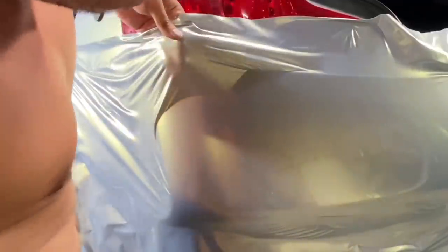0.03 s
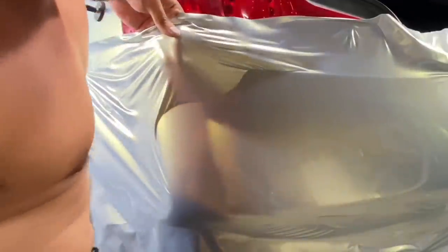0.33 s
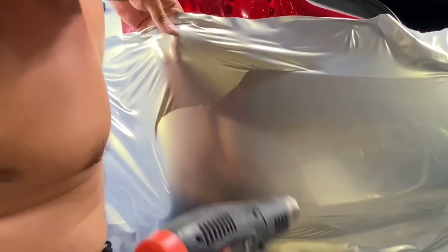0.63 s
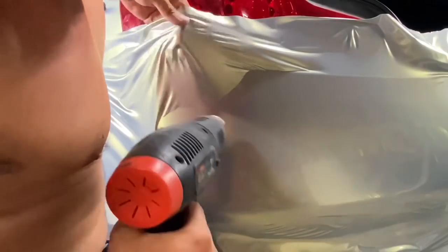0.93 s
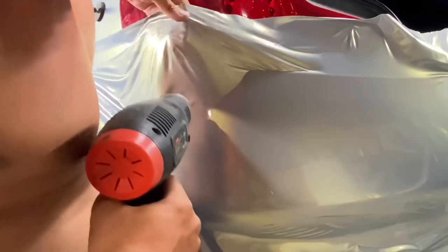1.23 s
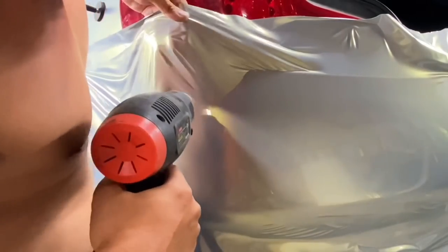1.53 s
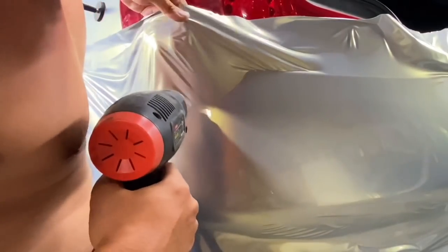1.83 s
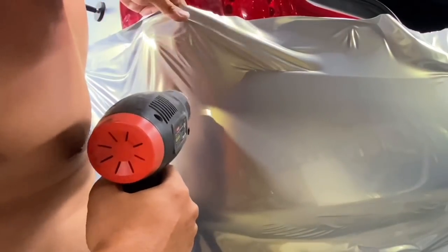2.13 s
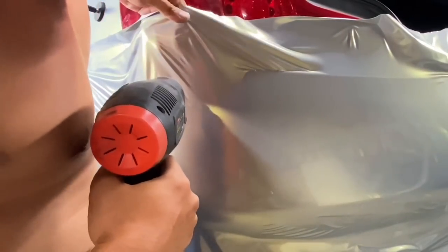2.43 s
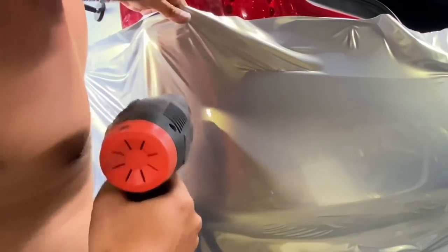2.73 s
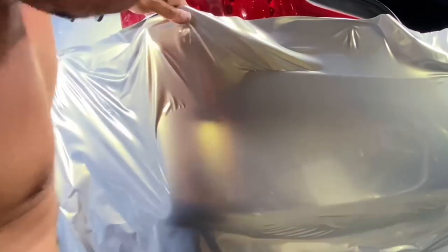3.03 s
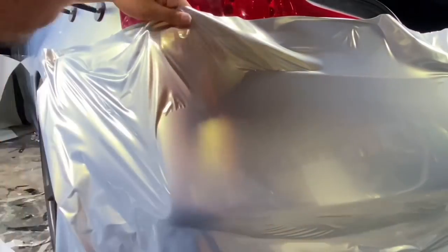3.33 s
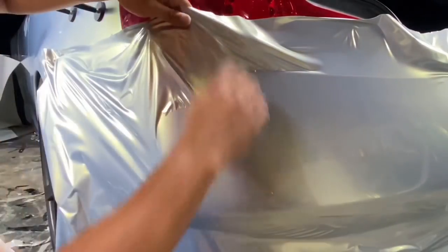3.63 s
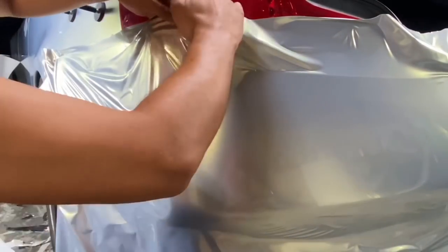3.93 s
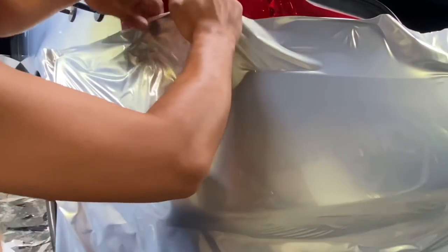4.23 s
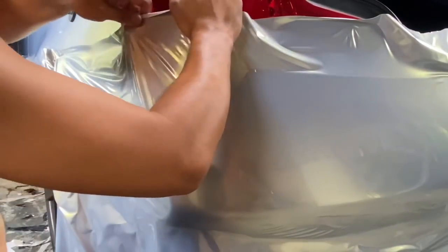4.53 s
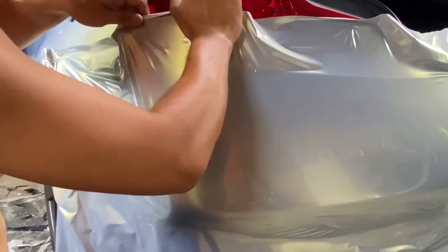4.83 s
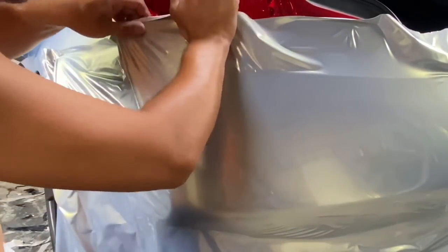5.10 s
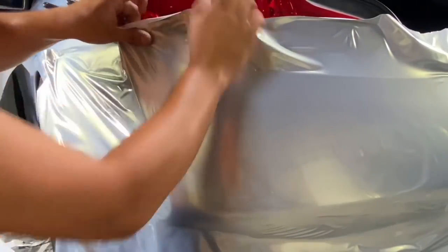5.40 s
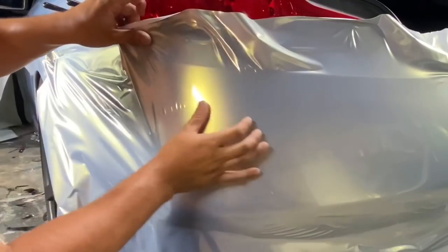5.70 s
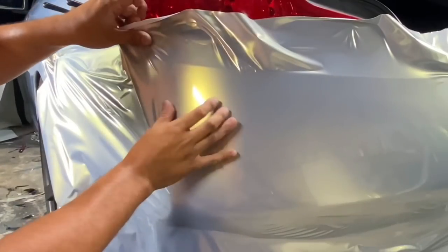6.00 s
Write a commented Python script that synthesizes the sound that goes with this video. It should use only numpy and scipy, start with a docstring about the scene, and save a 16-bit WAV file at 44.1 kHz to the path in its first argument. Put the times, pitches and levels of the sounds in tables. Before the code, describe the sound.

Stiff vinyl film snaps and crinkles close by in a small workshop. A heat gun spins up with a rising whine and blows steadily for about two seconds, then clicks off and coasts down. As it fades, the film cracks loudly several times with dull thumps on a car panel. Lighter crackles and low flaps follow as hands stretch the sheet, ending with faint palm rubs.

```python
"""Heat gun and vinyl wrap

Close by in a small workshop, a heat gun spins up, blows for two seconds and coasts down: harmonics of
its shaft sound over the turbulent rush of air. Hands pull stiff film over a car panel: creases buckle,
wrinkles crackle, the sheet flaps in its low modes, knocks send bending waves through the panel and a
palm rubs the film. The walls add a short reverberation over a low room rumble."""
import sys
import numpy as np
from scipy import signal
from scipy.fft import rfft, irfft, next_fast_len
from scipy.io import wavfile
from scipy.ndimage import uniform_filter1d, minimum_filter1d, map_coordinates

SR = 44100
rng = np.random.default_rng(int(sys.argv[2]) if len(sys.argv) > 2 else 0)


def unload_wav(signal):
    """Save mono or channel-first audio to the path in sys.argv[1] as 16-bit WAV at rate SR, clipped to [-1, 1]."""
    wavfile.write(
        sys.argv[1],
        SR,
        np.round(np.clip(np.atleast_2d(signal).T, -1, 1) * 32767).astype(np.int16),
    )


N = 276021
T = np.arange(N) / SR
ON_S, OFF_S, FULL_HZ = 0.69, 2.89, 239.1  # the gun's switching times and full shaft rate

# low modes of the stretched sheet and the panel under it: pitch_hz, level_db, t60_s
SHEET_MODES = [(110, 1.5, 0.17), (138.3, -4, 0.13), (182.1, -2.5, 0.18), (219.8, 3, 0.18), (306.3, 2, 0.1),
               (338, -7.5, 0.18), (401, -7.5, 0.15)]


def undb(db):
    """Amplitude ratio: tenfold for every 20 dB."""
    return 10 ** (np.asarray(db) / 20)


def unit(x):
    """Normalisation to an rms of 1."""
    return x / np.sqrt(np.mean(x ** 2) + 1e-20)


def curves(table):
    """Linear interpolation of each column over the times in the first."""
    times, *columns = np.transpose(table)
    return [np.interp(T, times, column) for column in columns]


def shape(points, hz):
    """Spectral envelope: (frequency_hz, level_db) points interpolated in log frequency."""
    point_hz, db = np.transpose(points)
    return np.interp(np.log(hz + 1), np.log(point_hz), db)


def colour(x, points, db_scale=1):
    """Minimum-phase filter: folding the cepstrum makes the given spectrum causal."""
    size = 2 * next_fast_len(x.shape[-1])
    cepstrum = irfft(np.log(undb(db_scale * shape(points, np.fft.rfftfreq(size, 1 / SR)))))
    cepstrum[1:size // 2] *= 2
    cepstrum[size // 2 + 1:] = 0
    return irfft(rfft(x, size) * np.exp(rfft(cepstrum)))[..., :x.shape[-1]]


def band(x, low_hz, high_hz, order=2):
    """Butterworth band-pass filter."""
    sos = signal.butter(order, [low_hz, min(high_hz, .45 * SR)], "band", fs=SR, output="sos")
    return signal.sosfilt(sos, x)


def highpass(x, corner_hz):
    """First-order high-pass filter."""
    return signal.sosfilt(signal.butter(1, corner_hz, "high", fs=SR, output="sos"), x)


def wander(rate_hz):
    """Random modulation: smoothed Gaussian steps with a spread near 1."""
    hold = int(SR / rate_hz)
    steps = np.repeat(rng.standard_normal(N // hold + 1), hold)
    return 1.3 * uniform_filter1d(uniform_filter1d(steps, hold), hold)[:N]


def diffuse(size, coherent_hz):
    """Diffuse field at two close microphones: coherent in the bass, unrelated above."""
    mid, side = rng.standard_normal((2, size))
    side = highpass(side, coherent_hz)
    return unit(np.array([mid + side, mid - side]))


def pan(db):
    """Level difference, left minus right, as a pair of gains."""
    return undb(np.array([[db], [-db]]) / 2)


def from_left(x, lag=6):
    """Arrival-time difference: the right channel lags by a few samples."""
    return np.array([x, np.pad(x, (lag, 0))[:len(x)]])


def workshop(x, wet_db, t60_s, lag=6):
    """Reverberation: near walls follow the direct sound with a dense exponential tail."""
    t = T[:SR // 2]
    tail = diffuse(len(t), 400) * undb(-60 * t / t60_s) * (1 - np.exp(-t / 0.0064))
    reflected = signal.fftconvolve(x[None], unit(tail) / np.sqrt(len(t)), axes=1)[:, :N]
    return from_left(x, lag) + undb(wet_db) * reflected


def room_rumble():
    """Ambient noise: a diffuse field of low rumble and faint hiss."""
    # background spectrum: frequency_hz, level_db
    spectrum = [(20, -25), (36, -7.5), (85, -5.5), (125, -6.5), (160, -18.5), (230, -15.5), (340, -30),
                (520, -25.5), (1200, -32), (5000, -53), (10000, -46.5), (12500, -67)]
    return unit(colour(diffuse(N, 450), spectrum)) * undb(-59.5 + 0.71 * wander(11))


def strain(swell_db=20.5, release_db_per_s=185.5):
    """Loading and release: each pull raises the crackle and wobble levels, then lets them fall."""
    # pulls of the hands: peak_s, build_s, crackle_db, wobble_db
    pulls = [(0.021, 0.1, -45.5, -72.5), (0.25, 0.91, -50.5, -68), (0.781, 0.098, -32, -44.5),
             (0.95, 0.052, -41, -42.5), (2.91, 0.55, -36.5, -51), (3.27, 0.29, -31, -40),
             (3.831, 1, -53, -55), (4.12, 0.78, -47.5, -55), (4.268, 0.2, -38.5, -41.5),
             (4.49, 0.055, -46, -52), (4.73, 0.13, -52, -42), (4.94, 0.088, -46, -44),
             (5.11, 0.061, -59, -48), (5.27, 0.27, -52.5, -45.5), (5.51, 0.064, -59.5, -56),
             (6.1, 0.09, -74, -48), (6.25, 0.098, -61, -54.5)]
    crackle_db, wobble_db = -90, -70.5  # film that is only held taut
    for peak_s, build_s, fine_db, low_db in pulls:
        slack_db = np.minimum(swell_db * (T - peak_s) / build_s, release_db_per_s * (peak_s - T))
        crackle_db = np.maximum(crackle_db, fine_db + slack_db)
        wobble_db = np.maximum(wobble_db, low_db + slack_db)
    return crackle_db, wobble_db


def wrinkles(size, rate_hz, range_db):
    """Poisson process: small folds flip independently, each a click of uneven strength."""
    strength = undb(np.minimum(4 * rng.exponential(size=size), range_db))
    polarity = rng.choice([-1, 1], size)
    return strength * polarity * (rng.random(size) < rate_hz / SR)


def pulled_film(gain_db=-6):
    """Random excitation: under strain, wrinkles give way and the sheet wobbles in its low modes."""
    crackle_db, wobble_db = strain()
    tick_spectrum = [(200, -25.5), (600, -15), (1400, 1.5), (3000, -5.5), (5000, -10), (9000, -15.5),
                     (12000, -28.5)]  # frequency_hz, level_db
    ticks = unit(colour(wrinkles(N, rate_hz=260, range_db=16), tick_spectrum))
    crackle = workshop(ticks * undb(crackle_db + gain_db), wet_db=2.5, t60_s=0.093)
    push = diffuse(N, 370)
    modes = sum(undb(db) * band(push, hz - 10, hz + 10, order=1) for hz, db, _ in SHEET_MODES)
    wobble = unit(modes) + undb(-2) * unit(band(push, 70, 510))
    return crackle + wobble * undb(wobble_db + gain_db + 2 * wander(25))


def crack(treble_db, ring_hz, slips=6):
    """Stress release: a crease flips with a pulse and smaller slips, ringing at a pitch set by its size."""
    # sharp front of a snap: frequency_hz, level_db
    spectrum = [(30, -46.5), (120, -28.5), (350, -23.5), (700, -5.5), (1150, -1.5), (1700, 1), (2200, -2),
                (2900, -1.5), (3900, -7.5), (5000, -5), (7000, -20), (9700, -14), (12000, -40),
                (14000, -52)]
    pulse = np.zeros(SR // 2)
    slip_at = np.minimum(rng.exponential(0.0017, slips) * SR, len(pulse) - 1).astype(int)
    pulse[slip_at] = 0.4 * rng.standard_normal(slips)
    pulse[int(.0007 * SR)] = 1
    hz = np.geomspace(400, 12000, num=40)
    resonance_db = 7 / (1 + (np.log(hz / ring_hz) / 0.12) ** 2)
    ripple_db = 2 * rng.standard_normal(len(hz))
    shelf_db = shape([(2800, 0.013), (6000, 1.14 * (treble_db + 5.5))], hz)
    return colour(colour(pulse, spectrum), np.transpose([hz, resonance_db + ripple_db + shelf_db]))


def sheet_rattle(ring_hz, sheet_t60_s=0.24, early_t60_s=0.13):
    """Free decay: the shaken sheet's grainy rattle dies away quickly."""
    # ring of the film: frequency_hz, level_db
    spectrum = [(35, -49.5), (60, -10.5), (112, 4), (218, -6.5), (529, -12.5), (690, 3), (881, -5),
                (1030, 3), (1230, -4), (1610, -1.5), (2560, -5.5), (7110, -7.5), (9700, -18),
                (12100, -30.5), (15700, -80.5), (22000, -120)]
    t = T[:SR // 2]
    decay = undb(-60 * t / sheet_t60_s) + undb(-11 - 60 * t / early_t60_s)
    attack = 1 - np.exp(-t / 0.0011)
    grains = undb(np.interp(t, np.linspace(0, .5, num=900), rng.standard_normal(900)))
    hz = np.geomspace(30, 16000, num=70)
    film_db = shape(spectrum, hz) + 2.2 * rng.standard_normal(len(hz))  # shifts with every fold
    noise = diffuse(len(t), 770)
    crinkle = from_left(unit(wrinkles(len(t), rate_hz=700, range_db=12)), lag=4)
    rattle = colour((noise + 0.52 * crinkle) * grains * decay * attack, np.transpose([hz, film_db]))
    return rattle + undb(4) * band(rattle, ring_hz / 1.31, ring_hz * 1.19, order=1)


def crease_snaps():
    """Snap-through buckling: each crease cracks and sets the whole sheet rattling."""
    # creases, and knocks of the handled gun: start_s, level_db, relative_crack_db,
    # relative_treble_db, ring_hz
    snaps = [(0.046, -32, 5, -0.5, 2830), (0.052, -24.5, 12.5, -26, 3270), (0.276, -58.5, 6, 9.5, 3020),
             (0.3897, -32.5, 2, -3, 2200), (0.551, -53, 7, -6, 2000), (0.689, -42.5, 5, -5.5, 1040),
             (0.696, -36.5, -13, -12, 1130), (0.759, -44, 9, 5, 1200), (0.769, -30, 6.5, -5, 1310),
             (0.812, -27.5, 9, -7, 1230), (3.11, -21, 14.5, -8.5, 2700), (3.114, -22, 17.5, -5.5, 1040),
             (3.198, -19.5, 14.5, -6.5, 1080), (3.2026, -29, 14, -5, 2420), (3.281, -22, 11, -3.5, 1680),
             (3.299, -32.5, 12, -21, 1540), (3.352, -29.5, 11, -12.5, 1660), (3.812, -43, 8, -17, 1450),
             (3.8182, -36.5, 9.5, -12.5, 1410), (3.8666, -44.5, 8.5, -6.5, 1390),
             (3.981, -51.5, 8.5, 5, 2010), (4.003, -47.5, 8.5, -1, 2650), (4.117, -49.5, 5, -11, 1180),
             (4.1824, -38, 6.5, -6, 2300), (4.209, -32, -4, -3.5, 3300), (4.246, -32.5, 4.5, -0.5, 3280),
             (4.2662, -33, 5.5, -1.5, 1640), (4.4655, -60, 5, 0, 1900), (4.485, -58, 13.5, -5, 1620),
             (4.5224, -48.5, 9.5, -3, 1690), (4.596, -53, 8, -5, 1710), (4.6486, -40.5, 6.5, 2.5, 1580),
             (4.718, -42, 0.5, -3.5, 1880), (4.839, -50, 6.5, -2, 1800), (4.896, -55, 8, -4, 1900),
             (4.918, -35, 9.5, -10, 1660), (4.9585, -38, 14, -9.5, 1850), (5.079, -52, 2, -7.5, 1730),
             (5.109, -59.5, 15.5, 0.5, 1600), (5.1708, -62, 9, 6.5, 6500), (5.21, -46.5, 5.5, -1, 2010),
             (5.2668, -48, 9, -6.5, 1810), (5.4748, -68.5, 10, 1, 6300), (5.4823, -69, 8, 5.5, 3380),
             (5.515, -56, 8.5, -6, 1680), (6.041, -51.5, 10, -7, 1690)]
    out = np.zeros((2, N + SR))
    front, body = int(.004 * SR), int(.03 * SR)  # opening spans whose rms sets the levels
    for start_s, level_db, crack_db, treble_db, ring_hz in snaps:
        click = crack(treble_db, ring_hz)
        click *= undb(level_db + crack_db - 1.2) / np.sqrt(np.mean(click[:front] ** 2))
        sound = from_left(click, lag=rng.integers(2, 11))  # each crease lies at another angle
        rattle = sheet_rattle(ring_hz)
        thud = band(rattle, 64, 450)
        middle = band(rattle, 770, 3700, order=3)
        treble = band(rattle, 4300, 11000, order=3) * pan(2.5)
        for part, part_db in [(thud, -22), (middle, -2), (treble, treble_db - 2)]:
            sound += part / np.sqrt(np.mean(part[:, :body] ** 2)) * undb(level_db + part_db)
        start = int(start_s * SR)
        out[:, start:start + len(click)] += sound * pan(3)  # the creases lie a little to the left
    return out[:, :N]


def panel_thumps(first_hz=443, last_hz=89, fall_s=0.0065, rise_s=0.0064):
    """Dispersion: higher bending waves travel faster, so each thump drops in pitch."""
    # hard knocks that bend the panel: start_s, level_db
    knocks = [(0.052, -44), (0.815, -30), (3.111, -31), (3.199, -19), (3.267, -33.5), (3.282, -31),
              (3.343, -47)]
    out, t = np.zeros(N + SR), T[:SR // 4]
    hz = last_hz + (first_hz - last_hz) * np.exp(-t / fall_s)
    envelope = t / rise_s * np.exp(1 - t / rise_s)
    thump = np.sin(2 * np.pi * np.cumsum(hz) / SR) * envelope
    for start_s, level_db in knocks:
        start = int(start_s * SR)
        out[start:start + len(t)] += thump * undb(level_db)
    return workshop(out[:N], wet_db=-10, t60_s=0.087)


def sheet_flaps(thud_t60_s=0.1):
    """Modal excitation: each flap thuds, and where it lands decides which low modes ring most."""
    # the sheet striking the panel: start_s, strongest_hz, level_db
    flaps = [(0.062, 290, -42.5), (0.823, 360, -34), (0.843, 113, -38.5), (3.128, 300, -43.5),
             (3.215, 263, -37), (3.827, 112, -43), (3.861, 222, -46), (4.246, 218, -40), (4.654, 113, -42),
             (4.721, 350, -40.5), (4.84, 362, -42), (4.908, 302, -46), (5.21, 189, -51),
             (5.271, 213, -47.5), (6.084, 185, -51)]
    out, t = np.zeros(N + SR), T[:SR // 2]
    attack = 1 - np.exp(-t / 0.0018)
    for start_s, strongest_hz, level_db in flaps:
        sound = unit(band(rng.standard_normal(len(t)), 76, 440)) * undb(-4 - 60 * t / thud_t60_s)
        for hz, mode_db, t60_s in SHEET_MODES:
            share = 1 / (1 + (np.log(hz / strongest_hz) / 0.38) ** 2)
            detune = 1 + .025 * rng.standard_normal()  # the tension varies
            mode = np.sin(2 * np.pi * (hz * detune * t + rng.random()))
            sound += share * mode * undb(1 + mode_db - 60 * t / t60_s)
        start = int(start_s * SR)
        out[start:start + len(t)] += sound * attack * undb(level_db)
    return workshop(out[:N], wet_db=0, t60_s=0.1)


def shaft_rate(spin_up_s=0.2, drag_share=0.8, friction_hz_per_s=100, crossover_hz=215):
    """Torque balance: the motor works against air drag; once off, drag and bearing friction brake it."""
    shortfall = np.exp(-np.maximum(T - ON_S, 0) / spin_up_s)
    driven_hz = FULL_HZ * (1 - shortfall) / (1 + drag_share * shortfall)
    # quadratic drag equals the constant friction at the crossover rate
    coast_s = np.maximum(T - OFF_S, 0)
    angle = np.arctan(FULL_HZ / crossover_hz) - friction_hz_per_s / crossover_hz * coast_s
    coasting_hz = crossover_hz * np.tan(np.maximum(angle, 0))
    return np.maximum(np.minimum(driven_hz, coasting_hz), 1)


def gun_levels(shaft_hz, whine_beaming=3.2):
    """Power laws: rush and whine grow with speed and nearness; the fan hums most at middling speed."""
    # the gun starts close, holds steady while blowing, then fades as it is put aside: time_s, nearness_db
    nearness = [(0.7, 7), (0.95, -0.7), (1.5, -0.5), (2.55, 0.1), (2.78, -2), (3.25, -3), (3.5, -11.5),
                (4.1, -10), (4.45, -24)]
    near_db, = curves(nearness)
    decades = np.log10(shaft_hz / FULL_HZ)
    unpowered = np.clip((T - OFF_S) / 0.12, 0, 1)  # without current the brushes stop buzzing
    air_db = -33.5 + 23 * decades + near_db
    whine_db = -39 + 41.5 * decades + whine_beaming * near_db - 2.5 * unpowered
    hum_db = -53 - 10 * ((shaft_hz - 126) / 26) ** 2
    flare_db = np.where(T > OFF_S, -38.5 - 28 * (T - OFF_S), -np.inf)  # as the fan starts to coast
    return air_db, whine_db, np.maximum(hum_db, flare_db)


def shaft_harmonics(orders, shaft_hz, pitch_bands, dull_db, flutter_db):
    """Standing waves: near the panel each harmonic swells and fades as it glides or the hand sways."""
    out, power, grid_hz = 0, 0, np.arange(0, 12000, 60)
    speed = shaft_hz / shaft_hz.max()
    swayed_hz = shaft_hz * (1 + 0.015 * wander(7))
    for order, level_db in orders:
        swell_db = 3 * wander(7) * np.minimum(8 * (1 - speed), 1)
        channel_db = np.zeros((2, N))
        for channel in range(2):
            field = np.interp(order * swayed_hz, grid_hz, rng.standard_normal(len(grid_hz)))
            standing_db = 3.5 * (field - 0.39 * field[speed > .98].mean())
            channel_db[channel] = standing_db + flutter_db * wander(12)
        soft_db = dull_db * order * (speed - 1)  # a slower rotor strikes more softly
        lift_db = sum(peak_db * np.exp(-((order * shaft_hz - centre_hz) / width_hz) ** 2)
                      for centre_hz, width_hz, peak_db in pitch_bands)
        cycles = order * np.cumsum(shaft_hz) / SR + rng.random() + np.array([[0], [order / 80]])
        gain = undb(level_db + soft_db + lift_db + swell_db + channel_db)
        out = out + gain * np.sin(2 * np.pi * cycles)
        power += undb(level_db) ** 2 / 2
    return out / np.sqrt(power)


def motor_whine(shaft_hz):
    """Harmonic series: multiples of the shaft rate glide together, swelling or dipping at set pitches."""
    # motor and fan harmonics: shaft_multiple, level_db
    orders = [(1, 1), (2, -1.5), (3, -5.5), (4, -1), (5, -22), (6, -5), (8, -11), (9, -16.5), (10, -12.5),
              (11, -17.5), (12, -12), (13, -15), (14, -20.5), (15, -11.5), (16, -14.5), (17, -11.5),
              (18, -26), (19, -20.5), (22, -32.5), (23, -35), (24, -29.5), (25, -21), (26, -23), (27, -28),
              (28, -32.5), (29, -29), (31, -44.5), (32, -41.5), (33, -26.5), (34, -30.5), (35, -17.5),
              (36, -18.5), (37, -25), (38, -25.5), (39, -21), (41, -33.5)]
    # pitch bands where the gliding whine swells or dips: centre_hz, width_hz, gain_db
    pitch_bands = [(1310, 100, -8), (1770, 70, 5), (2053, 120, 12), (2530, 190, -7), (3230, 60, 2.5),
                   (4350, 320, 6), (5830, 160, 14), (6500, 200, 10), (8230, 220, 5.5)]
    whine = shaft_harmonics(orders, shaft_hz, pitch_bands, dull_db=0.5, flutter_db=2)
    return band(whine, 430, 14000, order=3)  # the small housing radiates little bass


def fan_hum(shaft_hz):
    """Rotational noise: the fan's wavering tones are filtered by the vents."""
    # tones of the freely turning fan: shaft_multiple, level_db
    orders = [(4, 2.5), (6, -7), (8, -2.5), (10, -9), (12, -1), (14, -8.5), (16, -7)]
    # transmission of the vents: frequency_hz, gain_db
    vents = [(200, -9), (800, -4), (1250, 0), (1550, 6), (1800, 4), (2600, -11), (4000, -22)]
    wavering_hz = shaft_hz * (1 + .014 * wander(140))
    return colour(shaft_harmonics(orders, wavering_hz, [], dull_db=0, flutter_db=2.5), vents)


def panel_reflection(x, echo=0.14, delay_s=0.00206):
    """Comb filtering: the panel returns an echo whose path changes as the hand sways."""
    heard = []
    for channel in x:
        emitted_s = T - delay_s * (1 + 0.051 * wander(2.2))
        heard.append(channel + echo * map_coordinates(channel, [emitted_s * SR], order=1))
    return unit(np.array(heard))


def air_rush(shaft_hz):
    """Turbulence: the barrel colours broadband noise, eddies make it flicker, slower air hisses less."""
    # air through the barrel and vents: frequency_hz, level_db
    barrel = [(90, -32), (400, -15.5), (560, -14.5), (720, -1.5), (960, -1), (1380, -14.5), (1720, -5.5),
              (2300, -15), (3200, -18), (4400, -11.5), (5400, -22), (7600, -25), (9400, -24),
              (11500, -41.5)]
    noise = from_left(rng.standard_normal(N)) + undb(3) * diffuse(N, 430)
    air = panel_reflection(colour(noise, barrel))
    hiss_gain = undb(8 * (shaft_hz / shaft_hz.max() - 1.5))
    air += highpass(air, 2500) * (hiss_gain - 1)
    return air * undb(0.8 * wander(24))


def commutator(shaft_hz, rasp_rad=0.37):
    """Phase modulation: chatter of the brushes roughens the strong lines of the motor."""
    # strong motor lines: shaft_multiple, offset_db, left_minus_right_db
    orders = [(7, -0.5, 2), (20, 1, 6), (21, -2, 4), (30, 0, 3), (40, -6, -15)]
    # they swell and fade as the hand turns the gun: time_s, then level_db for each line
    levels = [(0.9, -80, -90, -90, -95, -99), (1.22, -56, -66, -60, -67, -72),
              (1.32, -50, -52, -62, -64, -66), (1.45, -47, -50, -54, -70, -61),
              (1.6, -50, -60, -58, -67, -52), (1.75, -46, -56, -60, -53, -50),
              (1.9, -46, -59, -54, -55, -57), (2.1, -45, -51, -55, -55, -52),
              (2.5, -50, -52, -56, -61, -48), (2.67, -45, -47, -57, -65, -57),
              (2.74, -45, -60, -64, -61, -61), (2.88, -48, -62, -66, -61, -63),
              (3.3, -90, -120, -120, -120, -120)]
    turns = np.cumsum(shaft_hz) / SR
    out = np.zeros((2, N))
    for (order, offset_db, side_db), level_db in zip(orders, curves(levels)):
        line = np.sin(2 * np.pi * order * turns + rasp_rad * wander(370))
        gain = undb(offset_db + level_db + 2 * wander(18) + wander(110))
        out += pan(side_db) * from_left(line, lag=2) * gain
    return np.sqrt(2) * out


def heat_gun():
    """Directivity: the vents beam motor, fan and air noise unequally to the two microphones."""
    # beam of the vents: frequency_hz, left_minus_right_db
    beam = [(200, -6), (600, 2.5), (1100, 11), (1450, 7), (1750, 1), (3000, 4), (4300, 3.5), (4800, 5),
            (5500, 6.5), (7200, 6.5), (8400, -9), (9600, -10), (11000, -3.5)]
    shaft_hz = shaft_rate()
    air_db, whine_db, fan_db = gun_levels(shaft_hz)
    shaft_hz = shaft_hz * (1 + .0005 * wander(25))
    whine = motor_whine(shaft_hz) * undb(whine_db)
    fan = fan_hum(shaft_hz) * undb(fan_db)
    air = air_rush(shaft_hz) * undb(air_db)
    left, right = whine + fan + air + commutator(shaft_hz)
    return np.array([colour(left, beam, db_scale=0.5), colour(right, beam, db_scale=-0.5)])


def palm_rubs(grip_db=4.5):
    """Stick-slip friction: the palm catches and slides as it smooths the film."""
    # strokes of the hand: peak_s, half_length_s, level_db
    strokes = [(0.969, 0.027, -39), (5.418, 0.027, -66), (5.82, 0.03, -62), (5.9, 0.03, -70),
               (6.001, 0.049, -67), (6.248, 0.02, -63)]
    # hiss of skin on film: frequency_hz, level_db
    skin = [(300, -11), (1100, 12.5), (1700, 1.5), (3000, -7), (4200, -13), (8000, -20), (12000, -34)]
    pressure = sum(undb(db) * np.exp(-((T - peak_s) / half_s) ** 2) for peak_s, half_s, db in strokes)
    return unit(colour(diffuse(N, 900), skin) * undb(grip_db * wander(130))) * pressure


def switch_click(tick_t60_s=0.014):
    """Impact: the switch snaps off with a dry tick and rings in damped modes."""
    # modes of the switch: pitch_hz, level_db, t60_s
    modes = [(1960, -10, 0.03), (3250, -3, 0.019), (3550, 3, 0.018), (3900, -11, 0.06),
             (6800, -12.5, 0.0428)]
    t = np.maximum(T - OFF_S - 0.0035, 0)
    ring = sum(np.sin(2 * np.pi * hz * t) * undb(db - 60 * t / t60_s) for hz, db, t60_s in modes)
    tick = unit(band(rng.standard_normal(N), 2300, 4300)) * (t > 0) * undb(-31 - 60 * t / tick_t60_s)
    return workshop(ring * undb(-29) + tick, wet_db=0, t60_s=0.15, lag=1)


def whistle():
    """Frequency modulation: a faint, unsteady tone arches up and slides away as the hand lets go."""
    # course of the whistle: time_s, pitch_hz, level_db
    course = [(5.38, 10000, -94), (5.44, 10200, -84), (5.56, 11500, -88), (5.68, 9800, -84),
              (5.8, 8100, -92)]
    hz, level_db = curves(course)
    tone = np.sin(2 * np.pi * np.cumsum(hz * (1 + .014 * wander(900))) / SR)
    sounding = (T > course[0][0]) & (T < course[-1][0])
    return from_left(tone * undb(level_db + 4 * wander(45)) * sounding, lag=0)


def scene():
    """Superposition: the pressures of gun, film, panel and room add."""
    return (heat_gun() + crease_snaps() + panel_thumps() + sheet_flaps() + switch_click()
            + pulled_film() + palm_rubs() + room_rumble() + whistle())


def record(dry):
    """Peak and band limiting: a fast limiter holds down the highest peaks, and the top is cut."""
    ceiling, hold, cutoff_hz = .85, int(.0004 * SR), 12200
    gain = ceiling / np.maximum(np.abs(dry).max(axis=0), ceiling)
    gain = uniform_filter1d(minimum_filter1d(gain, hold), hold)
    return signal.sosfilt(signal.ellip(8, .2, 70, cutoff_hz, fs=SR, output="sos"), dry * gain)


dry = scene()
out = record(dry)
unload_wav(out)
```